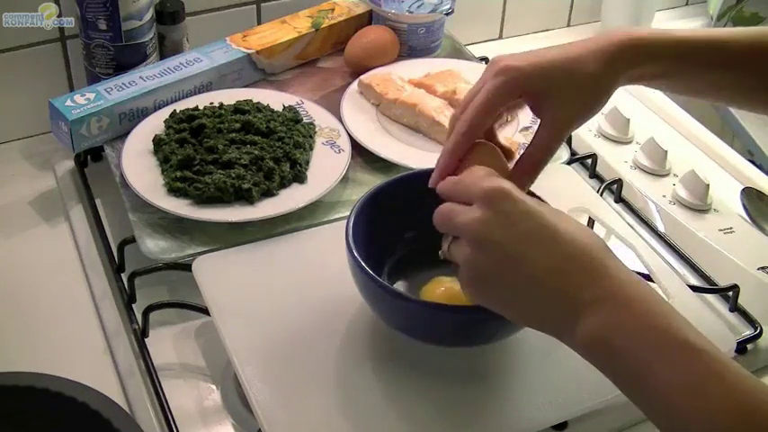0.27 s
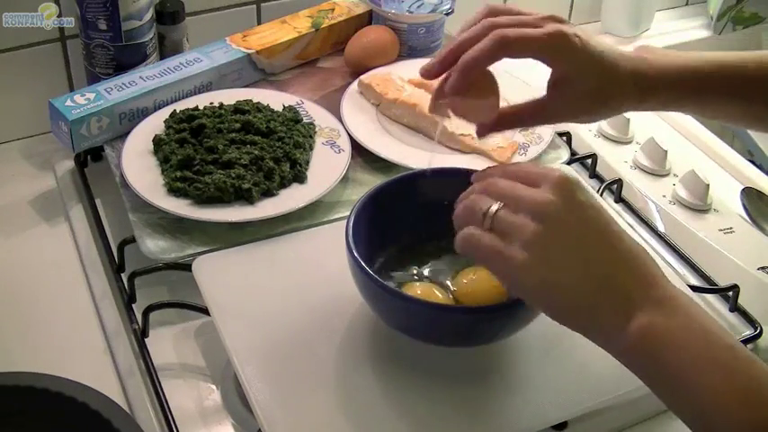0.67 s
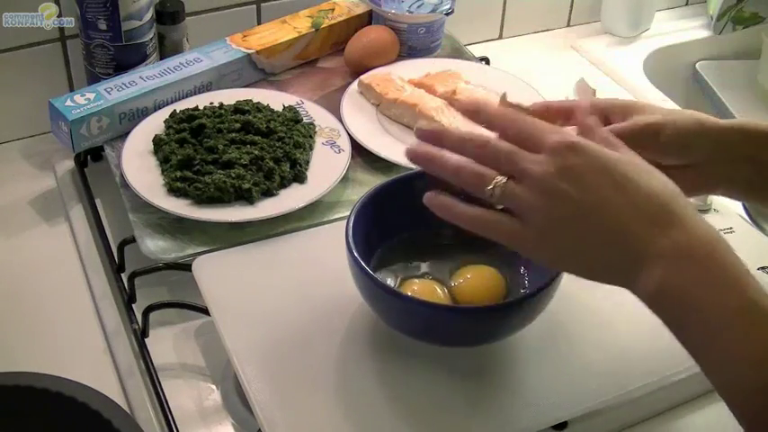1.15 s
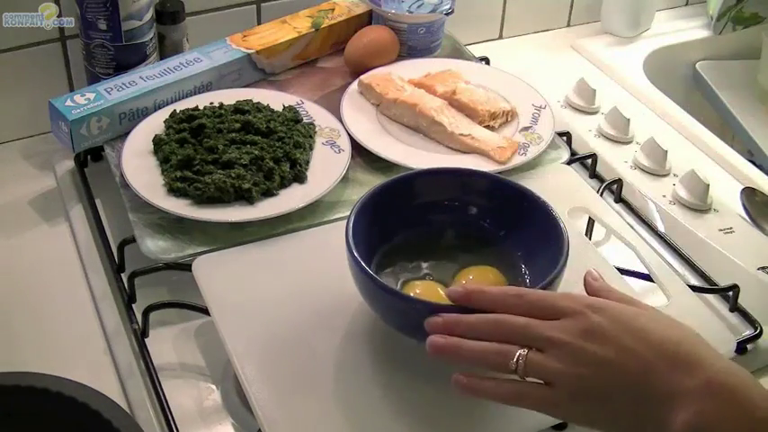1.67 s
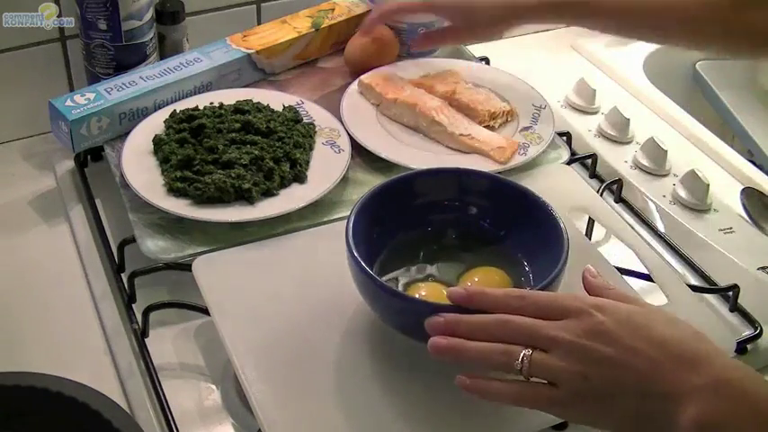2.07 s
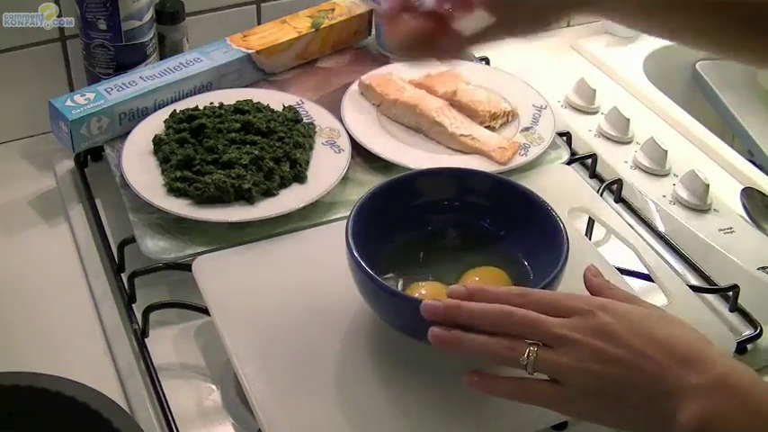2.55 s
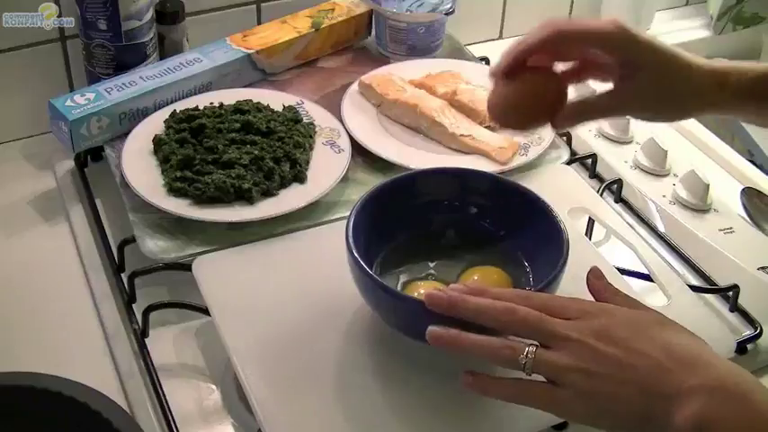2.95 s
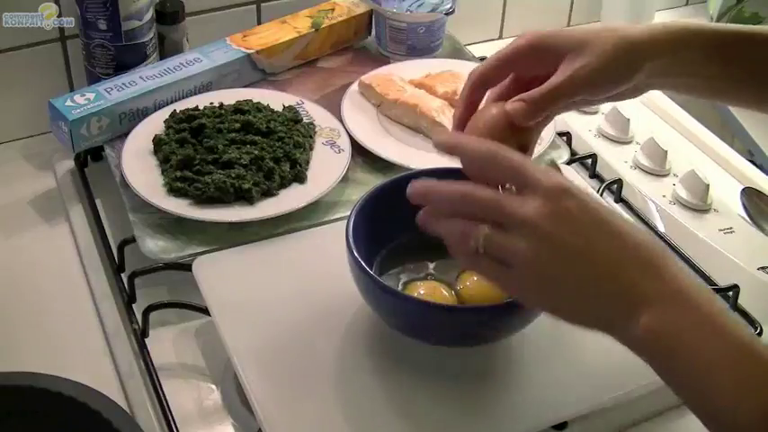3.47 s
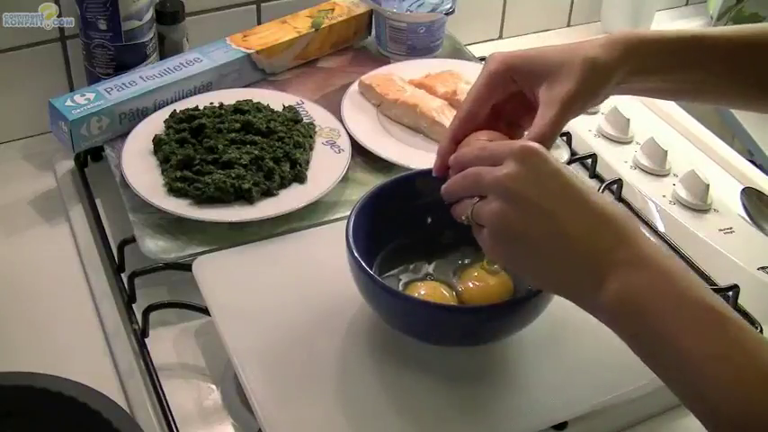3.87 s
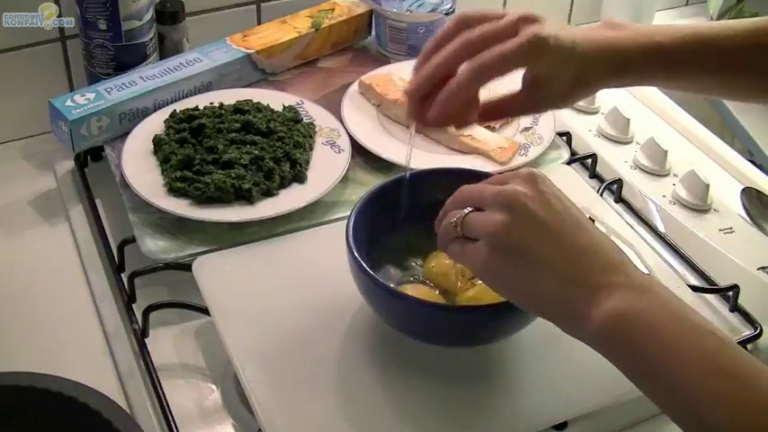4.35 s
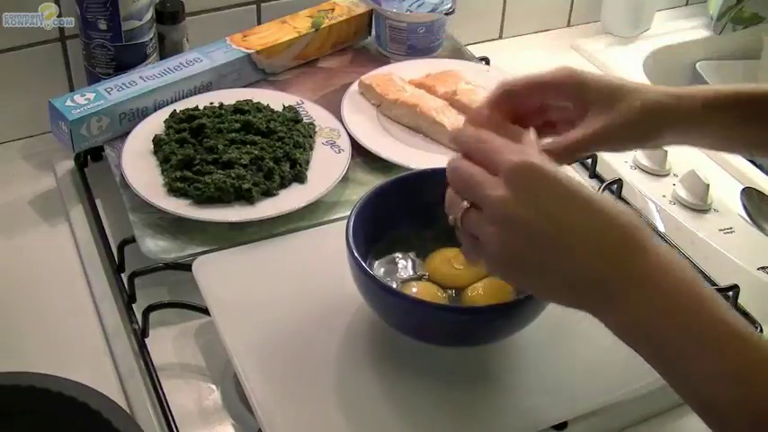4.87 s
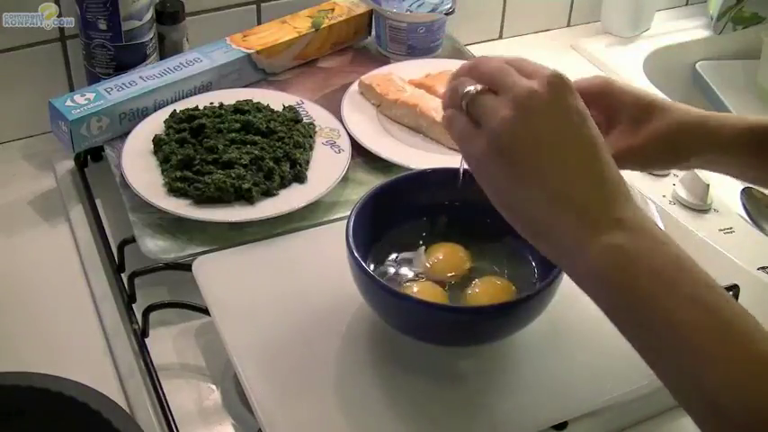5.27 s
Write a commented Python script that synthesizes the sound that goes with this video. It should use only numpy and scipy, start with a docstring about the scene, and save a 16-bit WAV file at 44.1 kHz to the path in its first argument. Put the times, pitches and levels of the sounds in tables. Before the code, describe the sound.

A home kitchen with hard reflective surfaces, heard in stereo from near the bowl, high treble cut off. An even rush of appliance air with faint wavering motor tones continues throughout; a very faint low drone joins after 3.4 s. At the very start an egg thuds against a ceramic bowl, with small wet plops until about 0.2 s. Between 0.4 and 1.0 s shell halves snap brightly with hollow pops, amid fine grating and little plops; fainter ticks follow at 1.6-1.8 s. At 2.4 s a loud hard clack sounds further off, then duller bumps until 3.0 s. At 3.4 s an egg knocks the bowl with a clear short ring; at 3.75 s a very sharp, loud crack follows, with a tiny plop. Loud blows briefly duck the background, which swells back. Shells crinkle at 4.2-4.9 s, snapping clearest near 4.57 s. A faint dull slide peaks around 5.4 s.

```python
"""Eggs knocked on the rim of a ceramic bowl: the shell fractures, the rim rings in its modes, the bowl thuds.
Half shells snap in showers of clicks that resonate in their hollows; the contents plop as soft filtered patter.
Further off, something clatters and thumps as damped resonances, and something slides in many tiny slips.
An appliance hums in filtered noise and wavering tones, and the kitchen adds reflections and a decaying tail.
A look-ahead gain control ducks just before each loud blow and lets the room swell up behind it."""
import sys
import numpy as np
from scipy import signal
from scipy.io import wavfile
from scipy.ndimage import uniform_filter1d, minimum_filter1d

SR = 44100
rng = np.random.default_rng(int(sys.argv[2]) if len(sys.argv) > 2 else 0)


def dump(signal):
    """Clip the signal to [-1, 1] and save it as 16-bit WAV at the path in sys.argv[1]."""
    limited = np.clip(np.atleast_2d(signal).T, -1, 1)
    pcm = np.round(limited * 32767).astype(np.int16)
    wavfile.write(sys.argv[1], SR, pcm)


N = 243007
T = np.arange(SR // 3) / SR  # time within one blow, s


# egg against the bowl: start_s, thud_db, rim_ring_db, shell_crack_db, crack_decay_s
KNOCK_EVENTS = [(0.001, -23, -36.5, -28, 0.021), (0.077, -33.5, -46, -38.5, 0.0072),
                (3.409, -19.5, -18.5, -25.5, .011), (3.567, -44, -65, -60, .008),
                (3.7517, -14, -12.5, -1, 0.0038), (3.796, -28, -53, -24.5, 0.0091),
                (3.840, -33.5, -55, -28, .003)]
# modes of the ceramic rim: pitch_hz, level_db, t60_s
RIM_MODES = [(2082, -13, .11), (2510, -11, .08), (2563, 0, .16), (3515, -20, .06), (4412, -12, .13),
             (4528, -16, .1), (5744, -23, .09), (6590, -26, .09)]
# modes of the bowl on its board: pitch_hz, level_db, t60_s
BOARD_MODES = [(443, -11.5, 0.042), (536, 9, 0.033), (585, 10, 0.18), (706, -5, 0.025), (779.5, -7.5, 0.27),
               (800, 1.5, 0.013), (1037, 8.5, 0.13), (1755, 8, 0.028)]
# spectrum of the dull thud: frequency_hz, relative_level_per_hz_db
THUD_COLOUR = [(40, -30.5), (120, -25.5), (250, -7.5), (550, 0.5), (1050, 1), (1400, 1.5), (2100, -7),
               (3200, -21.5), (8000, -44.5)]
# spectrum of the cracking shell: frequency_hz, relative_level_per_hz_db
CRACK_COLOUR = [(100, -41), (400, -26.5), (1000, 1.5), (1500, -2), (2400, 4.5), (3200, -8), (3900, -7),
                (4500, -2), (5400, -17), (6600, -8), (8000, -14)]
BOARD_DB = -3  # ring of bowl and board against the dull thud
# the more of a blow goes into the crack, the brighter the rim rings
RIM_TILT_DB, TILT_PER_CRACK = 7, 0.73  # dB per octave; the same per dB of crack over thud


def knocks():
    """Impact excitation: the shell cracks on the rim, the rim rings and the bowl thuds on its board."""
    out = np.zeros(N)
    swell = 1 - np.exp(-T / 0.00067)  # the yielding shell softens the blow
    for start, thud_db, ring_db, crack_db, decay in KNOCK_EVENTS:
        tilt_db = RIM_TILT_DB + TILT_PER_CRACK * (crack_db - thud_db)
        thud = colour(fracture(0.0095, rise=0.0009), THUD_COLOUR)
        board = sized(ring(BOARD_MODES), thud_db + BOARD_DB)
        rim = sized(ring(RIM_MODES, tilt_db), ring_db)
        crack = colour(fracture(decay, per_s=1800, spread_db=2.5), CRACK_COLOUR)
        add(out, start, sized(thud, thud_db))
        add(out, start, swell * (board + rim))
        add(out, start, sized(crack, crack_db))
    return out


# clear snaps of the shell: start_s, crackle_db, hollow_db, hollow_pitch_hz, decay_s
SNAP_EVENTS = [(0.589, -29, -37, 1796, 0.0026), (0.6943, -21.5, -23, 1682, 0.0026),
               (0.743, -30, -27, 1648, 0.0011), (0.8454, -45.5, -31.5, 1640, 0.00055),
               (0.847, -37, -38.5, 983, 0.006), (0.889, -33, -37.5, 4500, 0.004),
               (0.956, -38.5, -37.5, 3030, .007), (1.6399, -48, -33, 1820, 0.0023),
               (1.6694, -56, -38, 1775, 0.0015), (1.7027, -53.5, -51, 1930, .001),
               (1.7826, -41.5, -42, 1760, 0.0011), (4.229, -42.5, -84, 1790, .0027),
               (4.304, -48.5, -50, 1660, .0023), (4.547, -52, -42.5, 1740, 0.0014),
               (4.5705, -22.5, -27, 1686, 0.0036), (4.5737, -24, -23.5, 1378, 0.00055),
               (4.7231, -47.5, -38, 1745, .002), (4.760, -36.5, -39.5, 1420, .0025),
               (4.7798, -41, -38, 1540, 0.0022), (4.815, -42, -39.5, 3080, 0.0023),
               (4.836, -36, -34, 1916, 0.0096)]
# fingers working the shell: start_s, end_s, grating_db, mean_tick_db
HANDLING_SPANS = [(0.417, 0.54, -60.5, -48.5), (0.616, 0.97, -50.5, -50.5), (1.733, 1.782, -56, -49),
                  (4.431, 4.545, -61, -49.5), (4.778, 4.87, -51, -45)]
TICK_GAP_S, TICK_SPREAD_DB, TICK_DECAY_S = .033, 3, 0.0027  # mean spacing, scatter of level, decay
TICK_HZ, TICK_SPREAD_OCT, TICK_HOLLOW_DB = 1650, .08, -5  # hollow: median pitch, scatter, level re crackle


def shells():
    """Brittle failure: a few clear snaps, with small ticks at uneven moments while the fingers work."""
    out = np.zeros(N)
    for start, *settings in SNAP_EVENTS:
        add(out, start, snap(*settings))
    for start, end, _, mean_db in HANDLING_SPANS:
        for slot in np.arange(start, end, TICK_GAP_S):
            late = TICK_GAP_S * rng.random()
            level_scatter, pitch_scatter = rng.standard_normal(2)
            tick_db = mean_db + TICK_SPREAD_DB * level_scatter
            pitch_hz = TICK_HZ * 2 ** (TICK_SPREAD_OCT * pitch_scatter)
            add(out, slot + late, snap(tick_db, tick_db + TICK_HOLLOW_DB, pitch_hz, TICK_DECAY_S))
    return out


# spectrum of breaking and grating shell: frequency_hz, relative_level_per_hz_db
CRACKLE_COLOUR = [(80, -59), (500, -21), (1100, -23), (1700, 9), (2400, -3), (3300, 8.5), (4500, 2),
                  (6000, 4.5), (8000, 6)]


def snap(crackle_db, hollow_db, hz, decay, hollow_cycles=3.04, hollow_rise=0.0025,
         overtone=1.5, overtone_db=-25, build_up=0.6, pop=1.8):
    """Cavity resonance: a bright crackle, and a main break that pops the air in the half shell."""
    clicks = fracture(decay, rise=build_up * decay)
    hollow = np.sin(2 * np.pi * hz * T)
    hollow += amp(overtone_db) * np.sin(2 * np.pi * overtone * hz * T)
    hollow *= np.exp(-T * hz / hollow_cycles) * (1 - np.exp(-T / hollow_rise))
    # the main break and every click excite the hollow
    popped = pop * hollow + signal.fftconvolve(clicks, hollow)[:len(T)]
    return sized(colour(clicks, CRACKLE_COLOUR), crackle_db) + sized(popped, hollow_db)


def crinkle(per_s=500, spread_db=5):
    """Granular friction: tiny chips of shell grate on their membrane while the fingers move."""
    out = np.zeros(N)
    for start, end, level_db, _ in HANDLING_SPANS:
        length = round((end - start) * SR)
        size = rng.standard_normal(length)
        clicks = np.sign(size) * amp(spread_db * abs(size))
        clicks *= rng.random(length) < per_s / SR
        chips = colour(clicks, CRACKLE_COLOUR)
        chips /= chips.std() + 1e-12
        add(out, start, amp(level_db) * chips * signal.windows.tukey(length, .5))
    return out


# egg sliding out and landing: start_s, level_db, decay_s
PLOP_EVENTS = [(0.074, -33, 0.015), (0.100, -34.5, 0.028), (0.213, -45.5, 0.024), (0.590, -36, 0.0061),
               (0.743, -42.5, 0.004), (0.955, -40.5, 0.021), (3.836, -32.5, 0.0087)]
# spectrum of the wet patter: frequency_hz, relative_level_per_hz_db
PLOP_COLOUR = [(60, -24.5), (120, -19.5), (190, -7), (400, -2.5), (650, 13.5), (1000, 4), (2000, 3.5),
               (3500, -7.5), (8000, -58)]


def plops():
    """Distributed soft impact: white and yolk land as a decaying shower of filtered clicks."""
    out = np.zeros(N)
    for start, level_db, decay in PLOP_EVENTS:
        add(out, start, sized(colour(fracture(decay, per_s=1900), PLOP_COLOUR), level_db))
    return out


# things knocked about further off: start_s, thump_db, clack_db, decay_s, resonance_hz
BUMP_EVENTS = [(2.397, -27, -6.5, 0.0068, 1210), (2.414, -28, -25, 0.0096, 1510),
               (2.487, -27.5, -48, 0.0039, 967), (2.554, -33.5, -41, 0.014, 2060),
               (2.643, -47, -50, 0.0039, 584), (2.764, -24.5, -40, 0.013, 1365),
               (2.783, -19, -44.5, .013, 793), (2.838, -27, -55, 0.012, 476),
               (2.881, -34, -47.5, .004, 834), (2.975, -44.5, -55.5, 0.015, 750)]
# spectrum of the dull thump: frequency_hz, relative_level_per_hz_db
THUMP_COLOUR = [(40, -31.5), (130, -33.5), (260, -12), (450, -3.5), (850, 3.5), (1250, 0), (2200, -3),
                (3000, -18), (4500, -23.5), (8000, -62)]
# spectrum of the hard clack: frequency_hz, relative_level_per_hz_db
CLACK_COLOUR = [(100, -33), (400, -15), (900, -6), (1350, 2), (2600, 2.5), (4300, -3), (5400, 2),
                (6300, 0.5), (8000, -9)]
# modes of the hard thing that clatters: pitch_hz, level_db, t60_s
CLATTER_MODES = [(1340, 2, 0.013), (1669, -1.5, 0.046), (2185, 4.5, 0.033), (2318, -14, 0.057),
                 (3140, 3, 0.026), (3430, 1.5, 0.027), (4550, -14, 0.041), (5400, -6.5, 0.068),
                 (5530, -18, 0.075)]
BUMP_BUILD_UP = 0.32  # time constant of the build-up, as a share of the decay time


def bumps(ring_db=-6.0, body_db=-5.5, body_cycles=3.5):
    """Damped resonance: a lumpy thump with its own pitch, and a harder, briefly ringing clack on top."""
    out = np.zeros(N)
    for start, thump_db, clack_db, decay, hz in BUMP_EVENTS:
        rise = BUMP_BUILD_UP * decay
        thump = colour(fracture(decay, rise, per_s=2600, spread_db=3.5), THUMP_COLOUR)
        body = np.sin(2 * np.pi * hz * T) * np.exp(-T * hz / body_cycles)
        body *= 1 - np.exp(-T / max(rise, 1e-3))
        clack = colour(fracture(decay, rise, per_s=4500, spread_db=2.5), CLACK_COLOUR)
        clatter = ring(CLATTER_MODES) * (1 - np.exp(-T / 0.0033))
        add(out, start, sized(thump, thump_db))
        add(out, start, sized(body, thump_db + body_db))
        add(out, start, sized(clack, clack_db))
        add(out, start, sized(clatter, clack_db + ring_db))
    return out


# spectrum of something sliding softly: frequency_hz, relative_level_per_hz_db
SLIDE_COLOUR = [(60, -45), (120, -21), (240, -4), (470, 0), (950, -2), (1900, -12.5), (6000, -36)]
SLIDE_START_S, SLIDE_PEAK_S, SLIDE_RELEASE_S, SLIDE_DB = 5.18, 5.41, 0.046, -54


def slide(per_s=1500):
    """Sliding friction: a soft, dull scrape of many tiny slips that swells and dies away."""
    t = np.arange(N) / SR
    slips = colour(rng.standard_normal(N) * (rng.random(N) < per_s / SR), SLIDE_COLOUR)
    swell = np.interp(t, [SLIDE_START_S, SLIDE_PEAK_S], [0, 1])
    swell *= np.exp(-np.maximum(t - SLIDE_PEAK_S, 0) / SLIDE_RELEASE_S)
    return amp(SLIDE_DB) * swell * slips / slips.std()


# spectrum of the appliance's air: frequency_hz, relative_level_db
AIR_COLOUR = [(18, -60), (30, -40), (111, -18), (186, -15), (441, -9.5), (473, -9), (507, -7), (704, -7),
              (869, -11), (1200, -8), (1710, -14), (1830, -8), (3140, -17), (3970, -18.5), (8000, -30),
              (10400, -48.5), (17600, -120)]
# steady motor tones: pitch_hz, level_db
HUM_TONES = [(473.7, -64.5), (721.4, -66.5), (823.6, -67.5), (1830, -64.5), (1900, -72.5), (2218, -69),
             (2568, -74), (3935, -76), (5060, -82)]
# left-right likeness of the air, zero throughout: frequency_hz, likeness (0-1)
AIR_LIKENESS = [(60, 0), (430, 0), (8000, 0)]
AIR_DB = -55.5
DRONE_HZ, DRONE_START_S, DRONE_RISE_S, DRONE_DB = 190, 3.4, 0.43, -76  # sets in late


def background(waver=0.49):
    """Broadband and tonal noise: an even rush of air, wavering motor tones and a low drone."""
    hz, _, z = signal.stft(rng.standard_normal((2, N)), SR, nperseg=2048)
    z = paired(z, hz, AIR_LIKENESS) * amp(read(AIR_COLOUR, hz))[:, None]
    air = signal.istft(z, SR, nperseg=2048)[1][:, :N]
    out = amp(AIR_DB) * air / air.std()
    t, knots = np.arange(N) / SR, np.linspace(0, N / SR, num=60)
    drone = amp(DRONE_DB) * np.clip((t - DRONE_START_S) / DRONE_RISE_S, 0, 1)
    tones = [(tone_hz, amp(db)) for tone_hz, db in HUM_TONES] + [(DRONE_HZ, drone)]
    for tone_hz, gain in tones:
        # the phase wanders in a random walk, shared by both channels
        drift = np.interp(t, knots, waver * np.cumsum(rng.standard_normal(len(knots))))
        phase = 2 * np.pi * tone_hz * t + drift + rng.uniform(-1.43, 1, (2, 1))
        out += gain * np.sqrt(2) * np.sin(phase)
    return out


# kitchen reverberation: frequency_hz, t60_s
KITCHEN_T60 = [(150, 0.68), (500, 0.38), (1400, 0.32), (3700, 0.24), (8000, 0.23)]
# left-right likeness of the tail: frequency_hz, likeness (0-1)
TAIL_LIKENESS = [(150, .75), (500, 0.5), (1200, 0.24), (3000, 0), (8000, 0.)]


def kitchen(x, near_db, tail_db, right_db, lag_ms, count=14):
    """Room response: direct sound, reflections off worktop and tiles, and a tail most alike in the bass."""
    size = SR * 3 // 4
    taps = rng.standard_normal((2, size)) * (rng.random((2, size)) < 5000 / SR)
    hz, t, z = signal.stft(taps, SR, nperseg=256)
    z = paired(z, hz, TAIL_LIKENESS) * amp(-60 * t / read(KITCHEN_T60, hz)[:, None])
    tail = signal.istft(z, SR, nperseg=256)[1][:, :size]
    tail *= 1 - np.exp(-np.arange(size) / SR / 0.00057)
    response = amp(tail_db) * tail / np.linalg.norm(tail[0])
    # each reflection comes from its own side, so it reaches the two channels at slightly different times
    delays, sides = rng.uniform(0.0011, .014, count), rng.uniform(-1.2, 1, count)
    for delay, side, sign in zip(delays, sides, rng.choice([-1, 1], count)):
        at = np.round((delay + side * np.array([-1, 1]) * 0.00031) * SR).astype(int)
        response[[0, 1], abs(at)] += sign * amp(near_db) / np.sqrt(count)
    # direct sound, with a fraction of a sample's precision; the right channel lags
    lag = np.array([[0], [lag_ms * SR / 1000]])
    response[:, :32] += np.sinc(np.arange(32) - 8 - lag)
    wet = signal.fftconvolve(x[None], response, axes=1)[:, :N]
    return wet * amp([[-right_db / 2], [right_db / 2]])


def paired(z, hz, likeness):
    """Partial coherence: mixes two unrelated spectrograms until they are alike by the given degree."""
    same = np.clip(read(likeness, hz), 0, 1)[:, None]
    return np.array([z[0], same * z[0] + np.sqrt(1 - same ** 2) * z[1]])


def fracture(decay, rise=0., per_s=5000, spread_db=5):
    """Cascading fracture: a first break and a random shower of clicks, building up and dying away."""
    clicks = rng.standard_normal(len(T))
    clicks *= amp(spread_db * np.clip(rng.standard_normal(len(T)), -2, 2))
    clicks *= rng.random(len(T)) < per_s / SR
    clicks[0] = 3
    build_up = 1 - np.exp(-(T + 1 / SR) / max(rise, 1e-6))
    return clicks * np.exp(-T / max(decay, 1e-4)) * build_up


def ring(modes, tilt_db=0.):
    """Modal superposition: the free vibration of a struck body; a tilt favours the higher modes."""
    out = np.zeros(len(T))
    for hz, level_db, t60 in modes:
        envelope = amp(level_db + tilt_db * np.log2(hz) - 60 * T / t60)
        out += envelope * np.sin(2 * np.pi * (hz * T + rng.random()))
    return out


def colour(x, points, size=4096):
    """Minimum-phase filtering: a causal response with the given spectrum."""
    log_gain = np.log(amp(read(points, abs(np.fft.fftfreq(size, 1 / SR)))))
    taps = np.fft.ifft(np.exp(np.conj(signal.hilbert(log_gain)))).real
    return signal.fftconvolve(x, taps[:size // 2])[:len(x)]


def sized(x, db):
    """Energy normalisation: a blow gets the energy of a hundredth of a second at db."""
    return amp(db) * x / np.sqrt(np.sum(x ** 2) * 100 / SR + 1e-20)


def add(mix, start, sound):
    """Linear superposition: adds a sound to the mix from start (s)."""
    part = mix[max(round(start * SR), 0):][:len(sound)]
    part += sound[:len(part)]


def read(points, hz):
    """Logarithmic interpolation: a table's value at hz, joined on a log-frequency axis."""
    f, value = np.transpose(points)
    return np.interp(np.log(hz + 1), np.log(f), value)


def amp(db):
    """Logarithmic level: decibels to amplitude gain."""
    return 10 ** (np.asarray(db) / 20)


def scene():
    """Direct-to-reverberant balance: bowl and shells are close by, the bumps are mostly room sound."""
    bowl = kitchen(knocks() + plops(), near_db=-4.5, tail_db=-3, right_db=1.5, lag_ms=0.041)
    shell = kitchen(shells() + crinkle(), near_db=-13.5, tail_db=-2, right_db=1.0, lag_ms=0.041)
    far = kitchen(bumps() + slide(), near_db=0.0, tail_db=-1.5, right_db=0.9, lag_ms=0.033)
    return bowl + shell + far + background()


AHEAD_S, WINDOW_S = .018, .02  # gain control: look-ahead, power averaging
EDGE_HZ = 7980  # upper band limit


def record(dry, limit_db=-19.5, recovery_db_per_s=165):
    """Dynamic limiting: look-ahead gain drops fast and recovers at a steady rate; then a low-pass."""
    power = uniform_filter1d((dry ** 2).mean(0), round(WINDOW_S * SR))
    over_db = np.maximum(10 * np.log10(abs(power) + 1e-12) - limit_db, 0)
    reach = round(AHEAD_S * SR / 2)
    over_db = -minimum_filter1d(-over_db, 2 * reach + 1, origin=-reach)  # the loudest moment ahead counts
    fall = recovery_db_per_s * np.arange(N) / SR
    duck_db = uniform_filter1d(np.maximum.accumulate(over_db + fall) - fall, size=128)
    low_pass = signal.firwin(301, EDGE_HZ, window=("kaiser", 8), fs=SR)
    return signal.oaconvolve(dry * amp(-duck_db), low_pass[None], "same")


dry = scene()
out = record(dry)
dump(out)
```